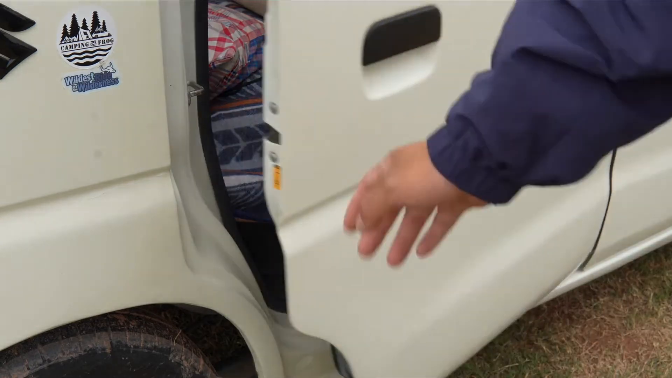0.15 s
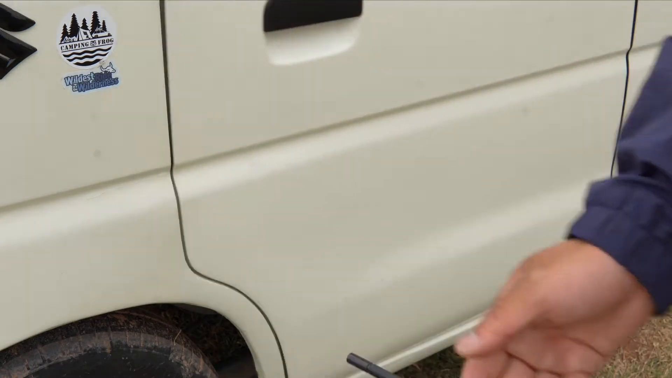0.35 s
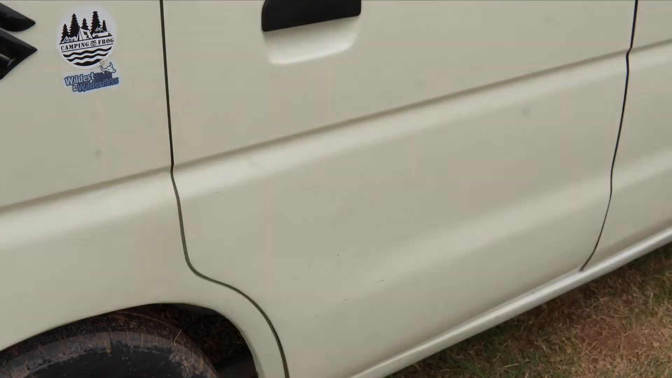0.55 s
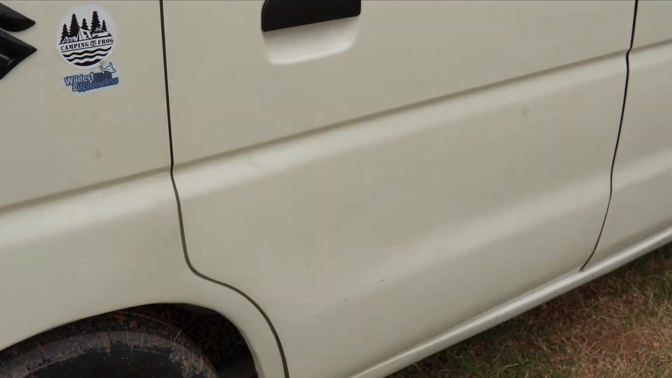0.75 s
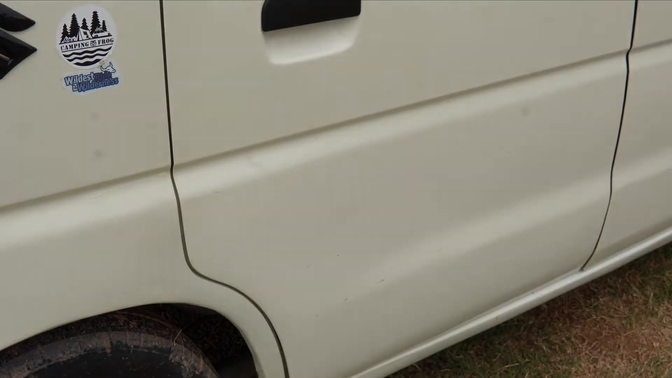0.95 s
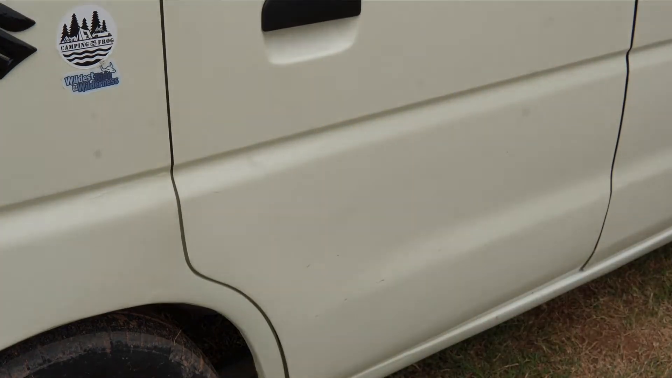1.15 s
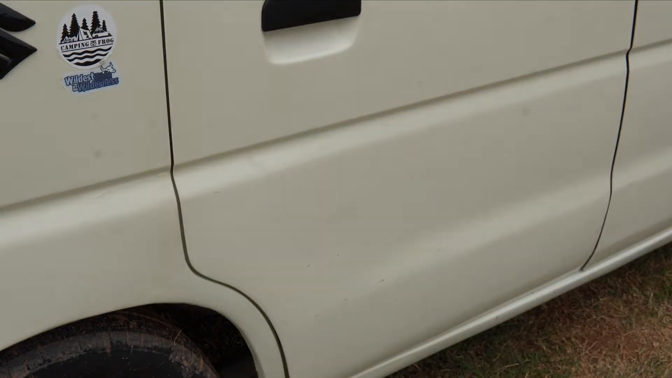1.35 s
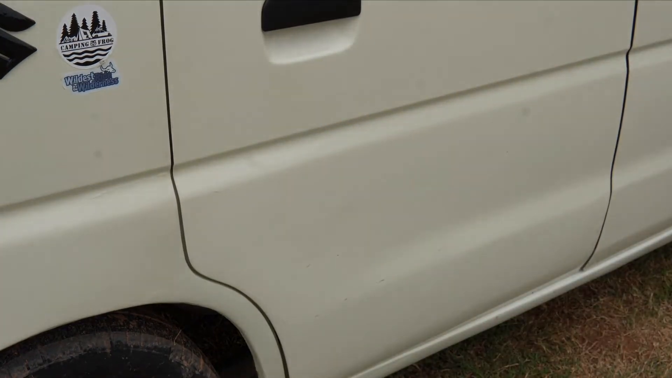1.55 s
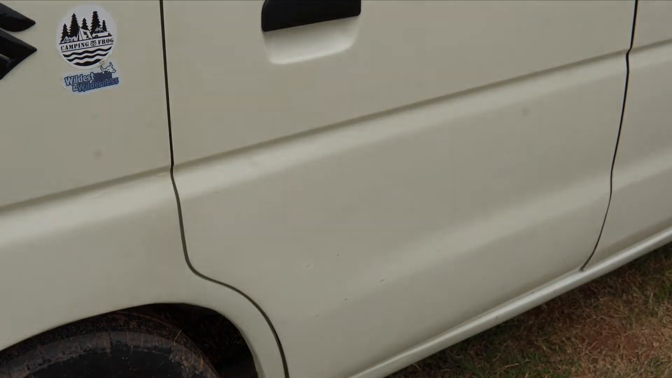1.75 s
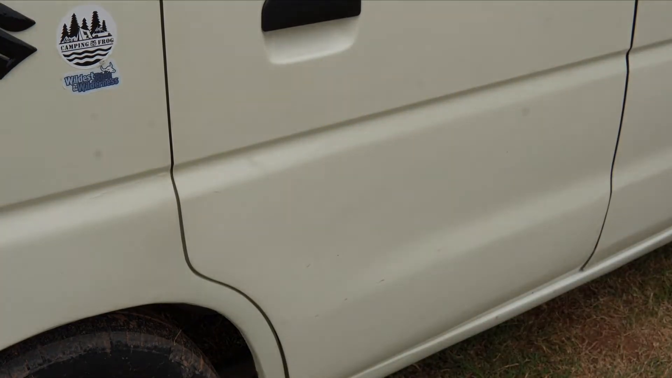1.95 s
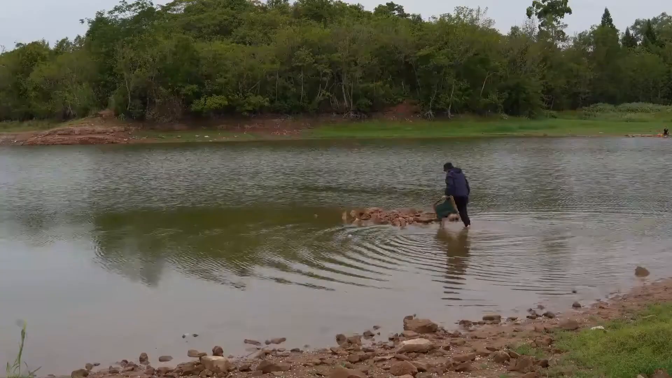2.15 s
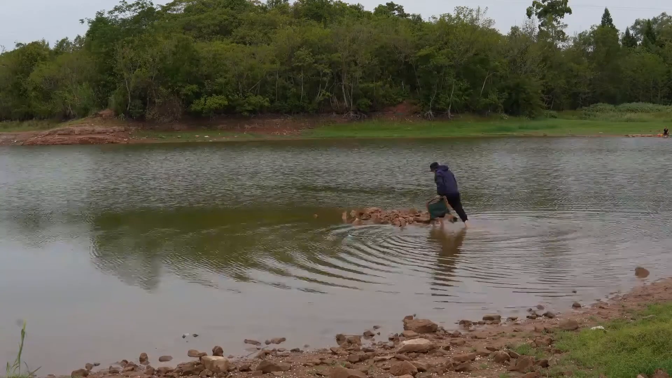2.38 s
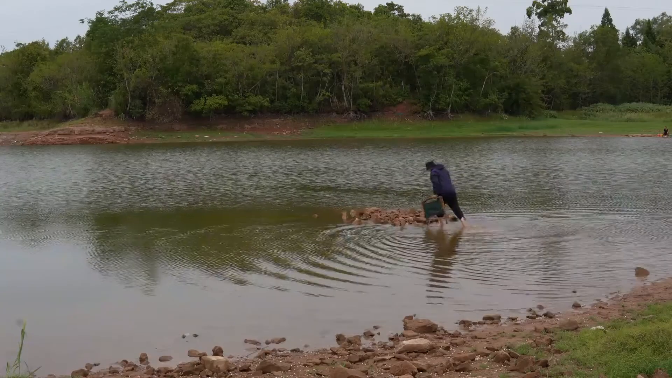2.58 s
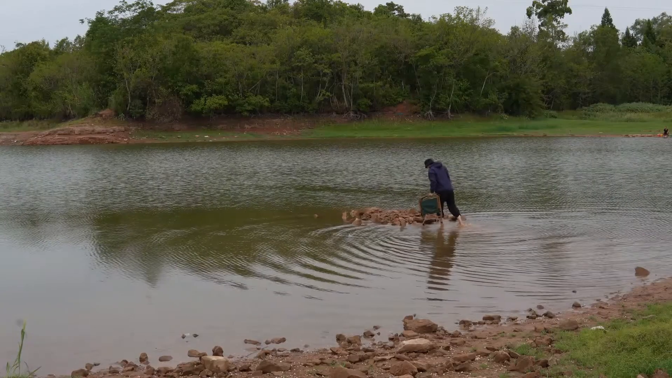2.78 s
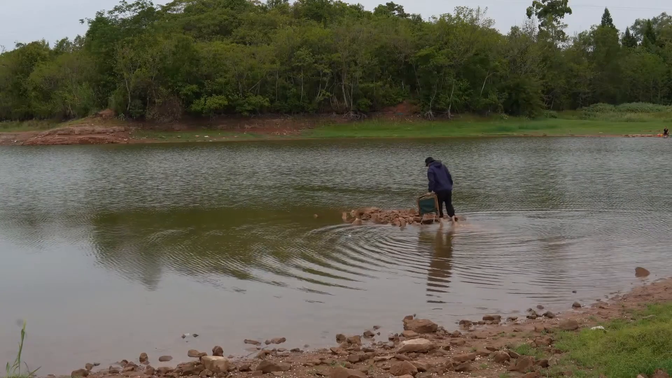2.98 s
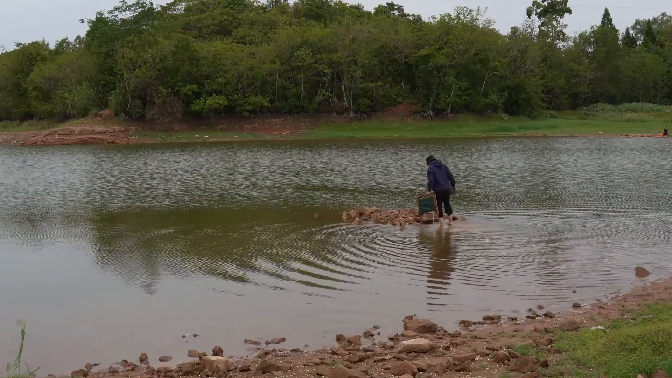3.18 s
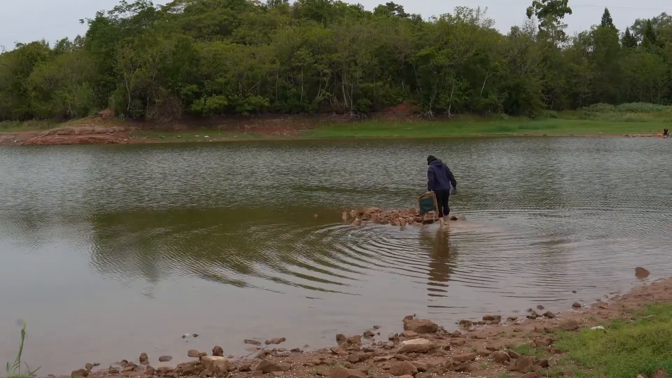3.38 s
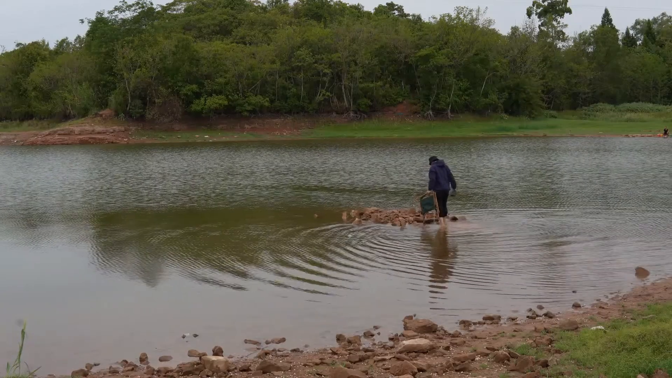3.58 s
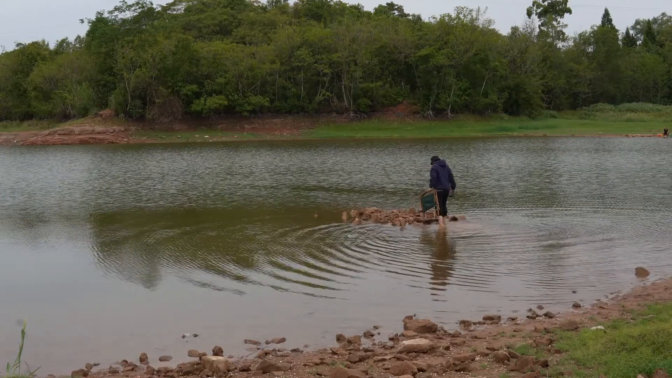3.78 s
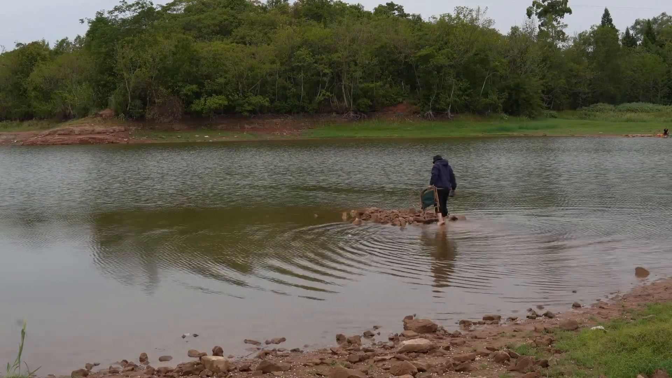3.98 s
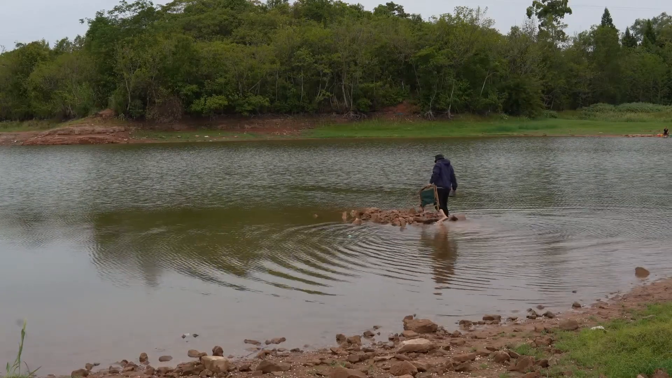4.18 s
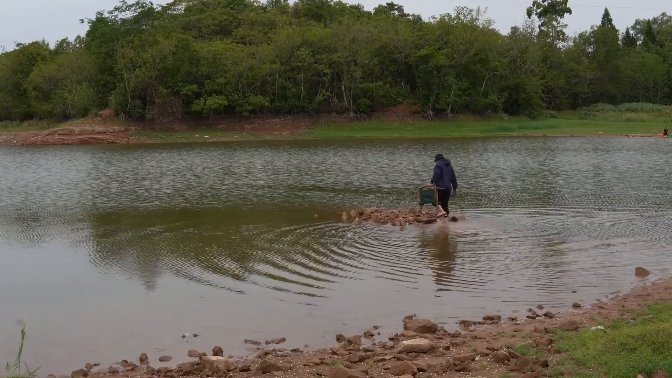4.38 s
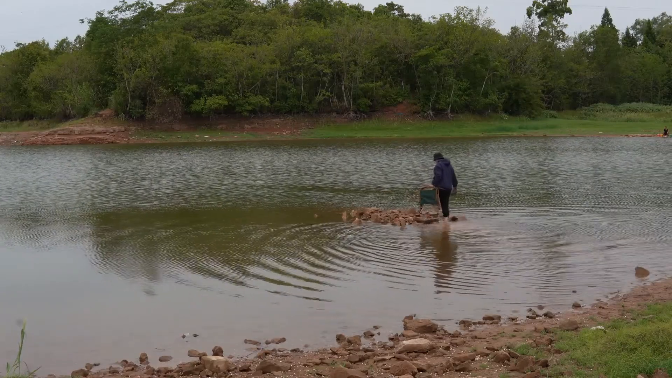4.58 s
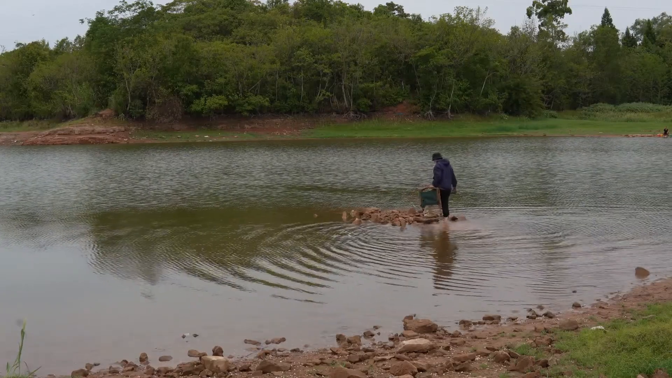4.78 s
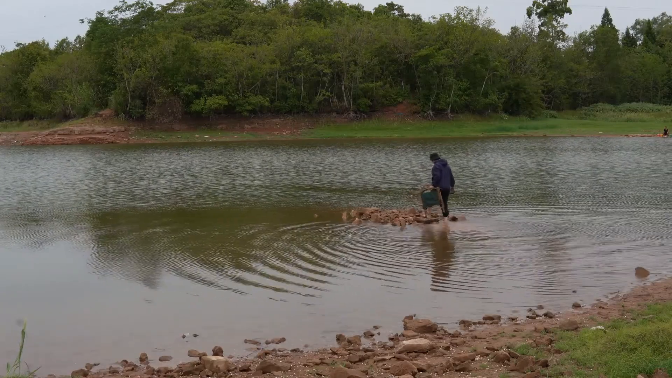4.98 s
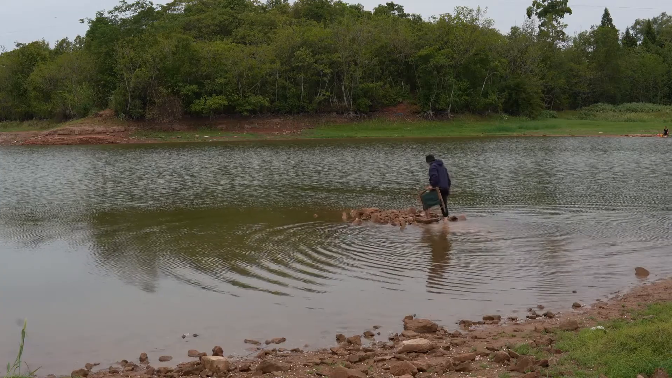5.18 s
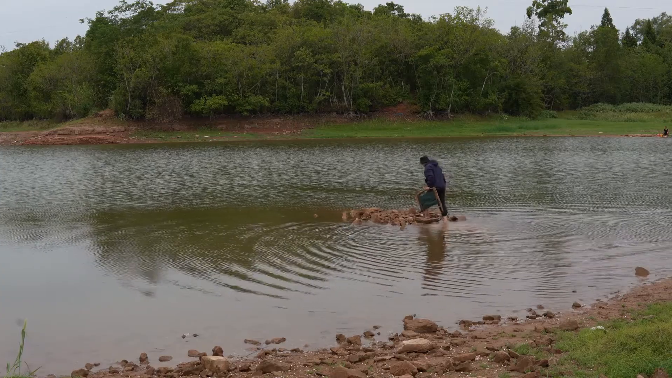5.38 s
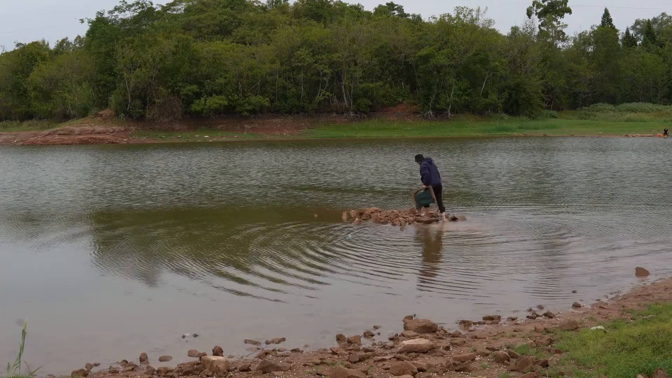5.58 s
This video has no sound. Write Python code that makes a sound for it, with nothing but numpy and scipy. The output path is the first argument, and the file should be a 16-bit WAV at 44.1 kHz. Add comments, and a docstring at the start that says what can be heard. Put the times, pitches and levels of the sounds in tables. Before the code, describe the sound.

A van's sliding door slams with a rattling bang under shrill cicadas, then the scene cuts to a lakeshore with faint wading splashes and drips.

```python
"""Van door slam, then a lake shore

A van's sliding door slams under a dense cicada chorus; cloth rustles and wind buffets the microphone.
Then the place changes to a lake shore: far wading splashes and drips, doves cooing, katydids rasping.
Door, drips and grains are ringing modes or decaying sines; coos and gusts are shaped sines;
insects, air, wind rumble, cloth and water are coloured stereo noise with moving levels.
"""
import sys
import numpy as np
from scipy import signal
from scipy.fft import rfft, irfft, next_fast_len
from scipy.io import wavfile

SR = 44100
rng = np.random.default_rng(int(sys.argv[2]) if len(sys.argv) > 2 else 0)


def digitize_waveform(pressure):
    """Quantize a signal to 16-bit integers and store it at the path in sys.argv[1].

    Rows of a 2-D input are taken as channels; values are limited to [-1, 1].
    """
    field = np.atleast_2d(pressure).T
    bounded = np.clip(field, -1, 1)
    quanta = np.round(bounded * 32767).astype(np.int16)
    wavfile.write(sys.argv[1], SR, quanta)


N = 248724


def from_db(db):
    """Decibels to gain."""
    return 10 ** (np.asarray(db) / 20)


def rms_one(x):
    """Scaled to rms 1."""
    return x / np.sqrt(np.mean(x ** 2) + 1e-20)


def seconds():
    """Time of every sample [s]."""
    return np.arange(N) / SR


def in_time(rows):
    """Each column of a curve, interpolated at every sample."""
    time_s, *columns = np.transpose(rows)
    return [np.interp(seconds(), time_s, column) for column in columns]


def at_hz(points, hz):
    """A curve read on a log-frequency axis."""
    point_hz, value = np.transpose(points)
    return np.interp(np.log(hz), np.log(point_hz), value)


def drift(corner_hz):
    """Slow chance of spread 1: noise twice through a one-pole low-pass."""
    step = 40  # samples between drawn values
    pole = np.exp(-2 * np.pi * corner_hz * step / SR)
    noise = rng.standard_normal(N // step + 2002)
    slow = signal.lfilter([1], [1, -2 * pole, pole * pole], noise)[2000:]
    return np.interp(np.arange(N) / step, np.arange(len(slow)), rms_one(slow))


def ring(clicks, hz, t60_s):
    """Two-pole resonator: a unit click starts a decaying sine of height 1."""
    r, w = from_db(-60 / (t60_s * SR)), 2 * np.pi * hz / SR
    return signal.lfilter([0, np.sin(w)], [1, -2 * r * np.cos(w), r * r], clicks + 1e-18)


def coloured(spectrum, likeness):
    """Stereo noise of rms 1 with a given spectrum and left-right likeness per frequency."""
    size = next_fast_len(N)
    hz = np.maximum(np.fft.rfftfreq(size, 1 / SR), 1)
    mid, side = rfft(rng.standard_normal((2, size))) * from_db(at_hz(spectrum, hz))
    alike = np.clip(at_hz(likeness, hz), -1, 1)
    left_right = np.sqrt(1 + alike) * mid + np.sqrt(1 - alike) * side * [[1], [-1]]
    return rms_one(irfft(left_right, size)[:, :N])


def panned(x, pan_db):
    """Left-right level split."""
    return x * from_db(np.multiply.outer([.5, -.5], pan_db * np.ones(N)))


def tone(rows):
    """Near sine along (time, pitch, level) rows, with soft ends and a slight waver."""
    t, (hz, db) = seconds(), in_time(rows)
    start_s, end_s = rows[0][0], rows[-1][0] + .02
    ends = np.clip(np.minimum(t - start_s, end_s - t) / 0.031, 0, 1)
    level = np.sqrt(2) * from_db(db + 2.2 * drift(26))
    phase = 2 * np.pi * np.cumsum(hz * (1 + 0.00717 * drift(17.2))) / SR
    return ends * level * np.sin(phase)


def grainy(colour, grains_per_s, cycles, grain_db, likeness):
    """Soft noise with a sprinkle of grains, each ringing for some cycles in one of 12 pitches."""
    sizes = from_db(5.3 * np.minimum(rng.exponential(1, N), 4)) * (rng.random(N) < grains_per_s / SR)
    dealt = rng.integers(0, 12, N)
    grains = sum(ring(sizes * (dealt == k), hz, cycles / hz)
                 for k, hz in enumerate(np.geomspace(1000, 2800, 12)))
    soft = coloured(colour, [(150, likeness), (3000, likeness - .1)]) * from_db(0.5 * drift(25))
    return soft + from_db(grain_db) * rms_one(grains)


def swells(rows, floor_db, attack_s, t60_s):
    """Gain over time: each movement rises, holds and dies away; powers add over a floor."""
    t, power = seconds(), from_db(2 * floor_db)
    for full_s, hold_s, db in rows:
        rise = np.clip((t - full_s) / attack_s + 1, 0, 1) ** 2
        decay_db = 60 * np.maximum(t - full_s - hold_s, 0) / t60_s
        power = power + (rise * from_db(db - decay_db)) ** 2
    return np.sqrt(power)


AIR_DB = -58
# far air and leaves: (frequency [Hz], density [dB per Hz])
AIR_COLOUR = [(59, -28), (100, -3), (242, -8), (514, -8), (713, -12.5), (2040, -13.5), (2460, -34),
              (3000, -12.5), (3900, 7), (6600, -120)]


def air():
    """Far air and leaves: steady noise, alike in both ears only at the bottom."""
    return from_db(AIR_DB) * coloured(AIR_COLOUR, [(100, 0.82), (500, 0.03), (3000, 0.066)])


# cicada chorus: (time [s], level [dB], left-right [dB])
CHORUS_LEVEL = [(0.0, -40.5, 2.5), (0.42, -40, 2.5), (0.6, -43.5, 3.5), (0.8, -41.5, 2.5), (1.08, -43, 3),
                (2.01, -42.5, 3), (2.21, -44, 3.0), (2.95, -42.5, 2.5), (4.08, -42.5, 0.7),
                (4.7, -40.5, 0.6), (5.64, -41, 0.5)]
# chorus spectrum: (frequency [Hz], density [dB per Hz])
CHORUS_COLOUR = [(1300, -59), (2300, -26), (2800, -19), (3150, -10.5), (3550, -0.5), (4050, -2.5),
                 (4480, 1), (5200, -4), (5850, -1.5), (6800, -7), (8300, -14), (10500, -19.5),
                 (13400, -23.5), (15800, -26.5)]
# chorus stereo: (frequency [Hz], left-right likeness [-1..1])
CHORUS_LIKENESS = [(2500, 0.12), (3600, 0.28), (4500, 0.26), (5500, 0.017), (9000, 0.029), (15000, 0.13)]


def cicadas(throb_hz, throb_db, patchy_db):
    """Many far singers merge to a hiss that throbs faintly at a wandering rate."""
    level_db, pan_db = in_time(CHORUS_LEVEL)
    phase = 2 * np.pi * np.cumsum(throb_hz * (1 + 0.0596 * drift(0.93))) / SR
    gain = from_db(level_db + throb_db * np.sin(phase) + patchy_db * drift(12.0))
    return panned(coloured(CHORUS_COLOUR, CHORUS_LIKENESS), pan_db) * gain


# how loud the katydids carry: (time [s], level [dB])
KATYDID_LEVEL = [(0, -87), (1.0, -63), (2.3, -62), (5.64, -53.5)]
# singers: (stroke rate [1/s], first stroke [s], strokes stop [s], relative level [dB], left-right [dB]); the
# steady wing hiss goes on
KATYDID_SINGERS = [(24.05, .023, 5.3, 0, 12), (24.75, .0345, 6, -1, -12), (22.55, .004, 6, -6, -12)]


def katydids(width_cycles, steady):
    """Wing strokes are noise bursts in the wing's high resonance; singers drift in and out of step."""
    out, t = 0, seconds()
    wing_colour = [(9000, -28), (12500, -9), (14000, -5.5), (15300, 6.0), (17000, -0.5)]
    for strokes_per_s, first_s, strokes_end_s, db, pan_db in KATYDID_SINGERS:
        cycle = ((t - first_s) * strokes_per_s + .5) % 1 - .5
        bumps = np.exp(-.5 * (cycle / width_cycles) ** 2)
        strokes = rms_one(bumps * from_db(1.7 * drift(16))) * (t < strokes_end_s)
        wing = coloured(wing_colour, [(1000, 0.81), (20000, 0.69)])
        out = out + panned(wing * (steady + strokes), pan_db) * from_db(db)
    return out * from_db(in_time(KATYDID_LEVEL)[0])


COO_SAG_HZ_PER_S, COO_FADE_DB_PER_S = 43.7, 11
ARCH_TOP, ARCH_DROP, ARCH_FADE_DB = 0.36, .11, 6  # share of length at top pitch; pitch share lost by the end
# near dove: (start [s], length [s], starting pitch [Hz], starting level [dB])
NEAR_COOS = [(2.69, 0.28, 412, -71.5), (3.25, 0.32, 413, -69), (3.63, .07, 401, -75), (5.03, .38, 403, -66),
             (5.592, .2, 400, -65.5)]
# farther dove: (start [s], length [s], top pitch [Hz], level [dB])
FARTHER_COOS = [(2.956, 0.099, 511, -70), (4.02, .24, 520, -72), (4.3, .34, 506, -71)]


def doves():
    """Near coos sag and fade; far ones arch up and down, broken by the moving air."""
    near = sum(tone([(s, hz, db),
                     (s + length_s, hz - COO_SAG_HZ_PER_S * length_s, db - COO_FADE_DB_PER_S * length_s)])
               for s, length_s, hz, db in NEAR_COOS)
    far = sum(tone([(s, hz * (1 - ARCH_DROP / 2), db),
                    (s + ARCH_TOP * length_s, hz, db),
                    (s + length_s, hz * (1 - ARCH_DROP), db - ARCH_FADE_DB)])
              for s, length_s, hz, db in FARTHER_COOS)
    return near + far * from_db(2.1 * drift(36))


LULL_DB, LULL_CORNER_HZ = 3, 4.8  # the wind comes and goes
# wind rumble: (time [s], level [dB])
WIND_LEVEL = [(0.0, -58.5), (0.41, -56.5), (0.9, -55), (1.16, -64.5), (1.55, -61.5), (1.81, -57.5),
              (1.97, -41), (2.215, -36), (2.23, -63), (2.29, -50), (2.58, -48.5), (2.8, -53), (2.95, -57.5),
              (3.06, -45.5), (3.38, -65.5), (4.4, -60), (5.3, -59.5), (5.64, -60)]
# single buffets: (time [s], sine height before its envelope [dB], frequency [Hz])
BUFFETS = [(1.897, -36.5, 39), (1.993, -34, 46.5), (2.093, -33.5, 78), (2.128, -34, 139),
           (2.204, -31.5, 106), (2.31, -45, 110), (2.45, -46, 110), (2.57, -45, 120), (2.701, -38.5, 61.9),
           (3.057, -33.5, 92)]


def wind(calm_db, rough_db):
    """Lumpy rumble that reaches higher as it grows, with single buffets as short low swings."""
    level_db = in_time(WIND_LEVEL)[0] + LULL_DB * drift(LULL_CORNER_HZ)
    dull = coloured([(15, -11.5), (40, -0.5), (80, -2.5), (160, -17.5), (400, -60.0)],
                    [(20, 1.0), (400, 0.89)])
    sharp = coloured([(15, -31), (60, -2), (150, -11), (300, -30.0), (600, -45.5)],
                     [(20, 0.81), (600, 0.68)])
    sharp_share = np.clip((level_db - calm_db) / (rough_db - calm_db), 0, 1)
    rumble = (1 - sharp_share) * dull + sharp_share * sharp
    out = from_db(level_db + 0.83 * drift(9.8)) * rumble
    for s, db, hz in BUFFETS:
        cycles = (seconds() - s) * hz
        out = out + from_db(db) * np.sin(2 * np.pi * cycles) * np.exp(-.5 * ((cycles - 0.46) / 0.53) ** 2)
    return out


PLACE_CHANGES_S = 2.222
CLOTH_FLOOR_DB, CLOTH_ATTACK_S, CLOTH_T60_S = -64, 0.075, 0.66
WATER_FLOOR_DB, WATER_ATTACK_S, WATER_T60_S = -86.5, .03, 0.37
# cloth and grass by the van: (fully risen [s], hold [s], level [dB])
CLOTH_MOVES = [(0.0, 0.14, -61.5), (0.78, 0.086, -54.5), (.95, 0.075, -53.5), (1.14, 0.071, -60),
               (1.34, 0.033, -60), (1.43, 0.13, -55.5), (1.77, 0.083, -53), (2.04, 0.13, -54)]
# cloth spectrum: (frequency [Hz], density [dB per Hz])
CLOTH_COLOUR = [(88, -36), (150, -5.5), (404, -6.5), (667, -5), (1060, -5), (2090, -5), (3000, -1),
                (3900, -19), (6600, -120)]
# wading strides at the shore: (fully risen [s], hold [s], level [dB])
STRIDES = [(2.42, 0.012, -70), (2.49, 0.01, -79.5), (2.93, 0.21, -65), (3.28, 0.034, -69),
           (3.39, 0.017, -68.5), (3.78, 0.2, -72.5), (4.42, 0.19, -64), (4.74, .15, -68),
           (5.27, 0.15, -73.5)]
# water spectrum: (frequency [Hz], density [dB per Hz])
WATER_COLOUR = [(290, -36), (500, -3), (621, -18), (1140, -6), (2300, -4), (2800, 2.5), (3640, -41),
                (6160, -120)]


def rustle_then_wading():
    """Grainy noise swells: cloth and grass by the van, then wading water at the shore."""
    cloth = grainy(CLOTH_COLOUR, grains_per_s=1300, cycles=6.2, grain_db=-10, likeness=0.18)
    water = grainy(WATER_COLOUR, grains_per_s=900, cycles=18.0, grain_db=-2.5, likeness=.8)
    by_van = cloth * swells(CLOTH_MOVES, CLOTH_FLOOR_DB, CLOTH_ATTACK_S, CLOTH_T60_S)
    at_shore = water * swells(STRIDES, WATER_FLOOR_DB, WATER_ATTACK_S, WATER_T60_S)
    return np.where(seconds() < PLACE_CHANGES_S, by_van, at_shore)


DRIP_T60_CYCLES = 50
# drops: (time [s], height before decay [dB], starting pitch [Hz])
DROPS = [(2.427, -52, 1880), (2.945, -52, 906), (3.193, -43.5, 980), (3.294, -55, 1830),
         (3.392, -50.5, 1000), (3.809, -52, 1510), (3.843, -57.5, 1030), (3.872, -53.5, 1760),
         (3.946, -55, 2060), (4.445, -51, 2220), (4.51, -51, 1140), (4.57, -52, 1400), (4.586, -54, 1130),
         (4.744, -57, 1410), (4.807, -47, 2040), (4.855, -51, 1510), (5.388, -55.5, 1230)]


def drips(rise_per_s):
    """Each drop's bubble rings briefly and rises in pitch."""
    out, t = np.zeros(N + SR), np.arange(SR // 4) / SR
    for s, db, hz in DROPS:
        i = round(s * SR)
        envelope = from_db(db - 60 * t * hz / DRIP_T60_CYCLES) * np.minimum(t / 0.00096, 1)
        out[i:i + len(t)] += envelope * np.sin(2 * np.pi * hz * t * (1 + rise_per_s * t))
    return panned(out[:N], -5.5)


# twigs, stones and slaps: (time [s], peak [dB], low edge [Hz], high edge [Hz])
TICK_BANDS = [(.185, -32, 2200, 15000), (0.364, -49.5, 396, 985), (.844, -42.5, 1086, 1800),
              (.99, -44, 400, 1980), (1.653, -40, 198, 1760), (2.07, -41, 400, 2500),
              (2.946, -43, 350, 2000), (3.073, -52, 900, 3000), (3.393, -49, 930, 2000),
              (4.455, -48, 2000, 3500), (4.729, -41, 1010, 4500), (4.788, -38, 1510, 5000),
              (4.8, -42, 1210, 3300), (4.812, -45, 1100, 3200), (5.28, -46, 2030, 3500)]


def ticks(t60_s):
    """Broad ticks: a few milliseconds of decaying noise between two band edges."""
    out, t = np.zeros(N), np.arange(1000) / SR
    noises = rng.standard_normal((len(TICK_BANDS), 1000))
    for (s, db, low_hz, high_hz), noise in zip(TICK_BANDS, noises):
        band = signal.butter(2, [low_hz, high_hz], "band", fs=SR, output="sos")
        burst = signal.sosfilt(band, noise * from_db(-60 * t / t60_s))
        out[round(s * SR):][:1000] += from_db(db) * burst / np.abs(burst).max()
    return out


def chatter(hz):
    """A contact is a few milliseconds of tiny touches, as strong at the given pitch as one unit click."""
    t = np.arange(200) / SR
    touches = (1 + 0.55 * rng.standard_normal(200)) * np.exp(-t / 0.0015) * np.cos(2 * np.pi * hz * t)
    return touches / np.abs(np.sum(touches * np.exp(-2j * np.pi * hz * t)))


HUM_S, HUM_HZ, HUM_DB, HUM_HOLD_S, HUM_LENGTH_S = .53, 352, -40, .16, 0.23
HUM_SAG_HZ, HUM_HELD_LOSS_DB, HUM_END_LOSS_DB = 4.2, 8, 29


def door_hum():
    """The door skin hums on after the latch closes, sagging in pitch."""
    return tone([(HUM_S, HUM_HZ, HUM_DB),
                 (HUM_S + HUM_HOLD_S, HUM_HZ - HUM_SAG_HZ, HUM_DB - HUM_HELD_LOSS_DB),
                 (HUM_S + HUM_LENGTH_S, HUM_HZ - 2 * HUM_SAG_HZ, HUM_DB - HUM_END_LOSS_DB)])


RATTLE_T60_S, RATTLE_LONGER_PER_S = 0.07, 0.77  # rattles last longer as the door settles
KNOCK_T60_CYCLES, CRACK_T60_S = 10.3, 0.036
# contacts: (time [s], knock pitch [Hz], knock [dB], panel thud [dB], latch ring [dB], crack [dB], rattle [dB])
DOOR_CONTACTS = [(0.426, 457, -16.5, -53, -42.5, -29.5, -26), (0.43, 760, -14.5, -44, -53.5, -44.5, -38),
                 (0.443, 1790, -13, -38, -57, -39, -30.5), (0.457, 175, -26.5, -40, -30.5, -30.5, -28),
                 (0.472, 227, -29, -49, -53, -34, -26), (0.484, 1350, -11.5, -43, -55.5, -26.5, -30.5),
                 (0.491, 181, -24, -36, -36, -48.5, -31), (0.511, 152, -28, -52, -49, -27, -27.5),
                 (0.52, 290, -30.5, -54, -26.5, -17.5, -31), (0.554, 346, -25.5, -42, -49.5, -33.5, -35.5),
                 (0.584, 280, -27, -46.5, -27.5, -38, -35), (0.65, 335, -35.5, -54, -42, -57, -42)]
# door skin and cabin modes: (frequency [Hz], level [dB], t60 [s])
PANEL_MODES = [(68.3, -1, 0.6), (117, -19, .3), (150, 5, 0.22), (173.3, -6.5, 0.46), (221.8, -6, 0.57),
               (281, -7, 0.33), (484, -7.5, 0.26), (577, -10, 0.33), (666, -8.5, 0.39), (820, -7, 0.27),
               (979, 0.5, 0.12)]
# latch and rail modes: (frequency [Hz], level [dB], t60 [s])
LATCH_MODES = [(1196, -20, .1), (1390, -22, 0.13), (1880, -10, 0.072), (1953, -11.5, 0.14),
               (2543, 3, 0.049), (2770, -8.5, 0.071), (3420, 7.5, 0.032), (3870, -16, .04),
               (4400, -11, 0.099), (5330, -20, 0.034), (7150, -8, 0.034), (8400, -12, 0.045)]
# loose-part spectrum: (frequency [Hz], density [dB per Hz])
RATTLE_COLOUR = [(24, -39), (40, 3), (230, -3), (275, 3), (785, -8.5), (1430, -7.5), (1580, -6.5),
                 (3520, -7), (5670, -15.5), (13900, -25), (15800, -28)]


def door():
    """Each contact knocks, cracks, strikes panel and latch modes and shakes loose parts into a rattle."""
    s, knock_hz, knock_db, thud_db, latch_db, crack_db, rattle_db = np.transpose(DOOR_CONTACTS)
    rattle_t60_s = RATTLE_T60_S + RATTLE_LONGER_PER_S * (s - s[0])
    at, body, heard = np.round(s * SR).astype(int), np.zeros(N), 2 * SR
    for modes, strike_db in ((PANEL_MODES, thud_db), (LATCH_MODES, latch_db)):
        for hz, mode_db, mode_t60_s in modes:
            clicks = np.zeros(heard)
            strengths = from_db(strike_db + mode_db + rng.normal(0, 1.5, len(at)))
            clicks[at] = strengths * rng.choice([-1, 1], len(at))
            body[:heard] += ring(np.convolve(clicks, chatter(hz))[:heard], hz, mode_t60_s)
    shake, snap, t = np.zeros(N), np.zeros(N), np.arange(SR) / SR
    for k, i in enumerate(at):
        knock = from_db(knock_db[k] - 60 * t * knock_hz[k] / KNOCK_T60_CYCLES)
        body[i:i + SR] += knock * np.sin(2 * np.pi * knock_hz[k] * t)
        shake[i:i + SR] += from_db(rattle_db[k] - 60 * t / rattle_t60_s[k]) * np.minimum(t / 0.0012, 1)
        snap[i:i + SR] += from_db(crack_db[k] - 60 * t / CRACK_T60_S)
    grain = from_db(1.4 * drift(190))  # loose parts knock unevenly
    rattle = shake * grain * coloured(RATTLE_COLOUR, [(400, 1.0), (2000, 0.77), (8000, 0.73)])
    high_pass = signal.butter(2, 5500, "high", fs=SR, output="sos")
    bright = signal.sosfilt(high_pass, rng.standard_normal((2, N)))
    crack = snap * (bright + 0.089 * bright[0])
    return body + door_hum() + rattle + crack


def scene():
    """Air, insects, doves, wind, cloth and water, drips, ticks and door together."""
    insects = cicadas(throb_hz=38.2, throb_db=0.6, patchy_db=0.5) + katydids(width_cycles=0.078, steady=.35)
    background = air() + insects + doves() + wind(calm_db=-57.0, rough_db=-26)
    return background + rustle_then_wading() + drips(rise_per_s=1.46) + ticks(t60_s=0.016) + door()


CEILING, STOPBAND_HZ = 0.13, 15800 * 1.02


def record(dry):
    """Peaks are rounded by tanh, then the top is cut steeply."""
    rounded = CEILING * np.tanh(dry / CEILING)
    return signal.sosfilt(signal.cheby2(16, 80, STOPBAND_HZ, fs=SR, output="sos"), rounded)


dry = scene()
out = record(dry)
digitize_waveform(out)
```